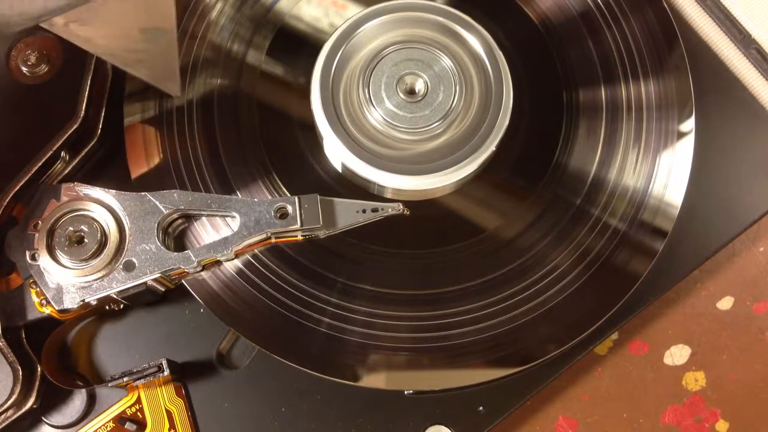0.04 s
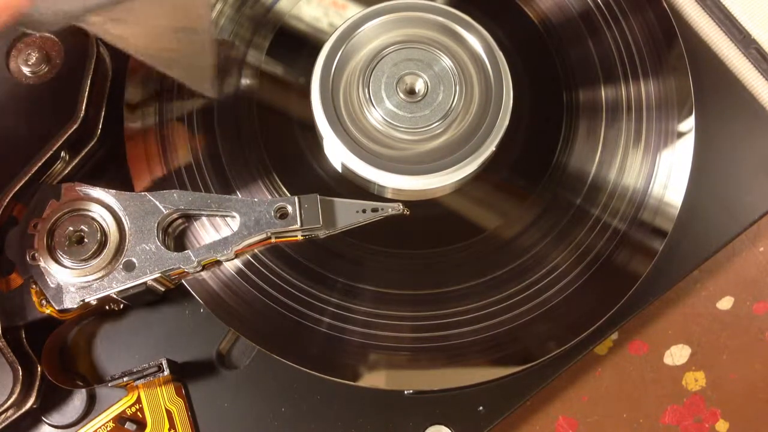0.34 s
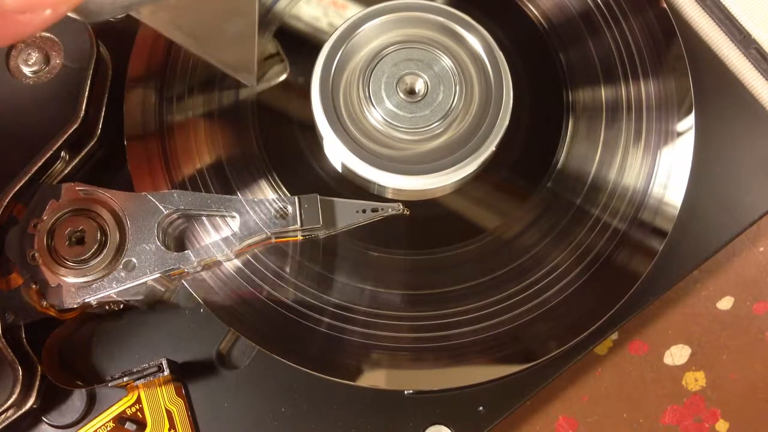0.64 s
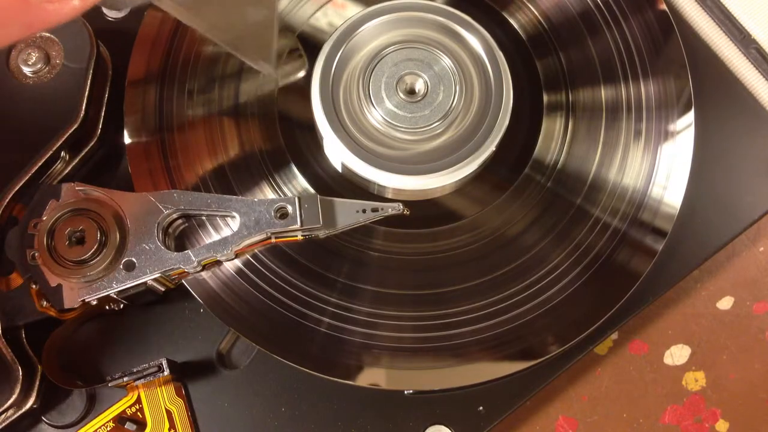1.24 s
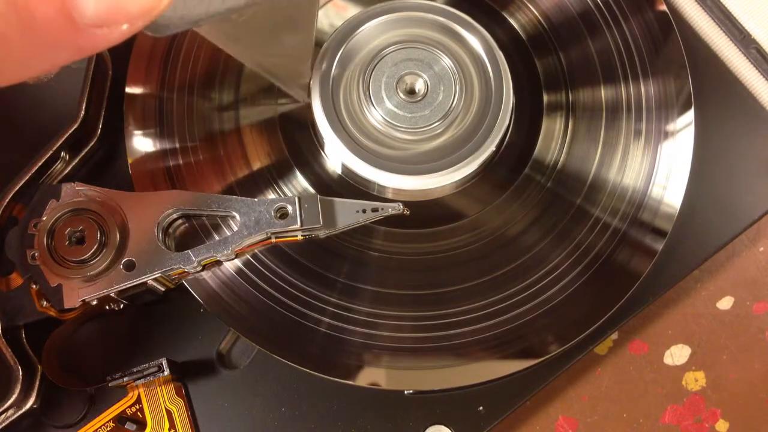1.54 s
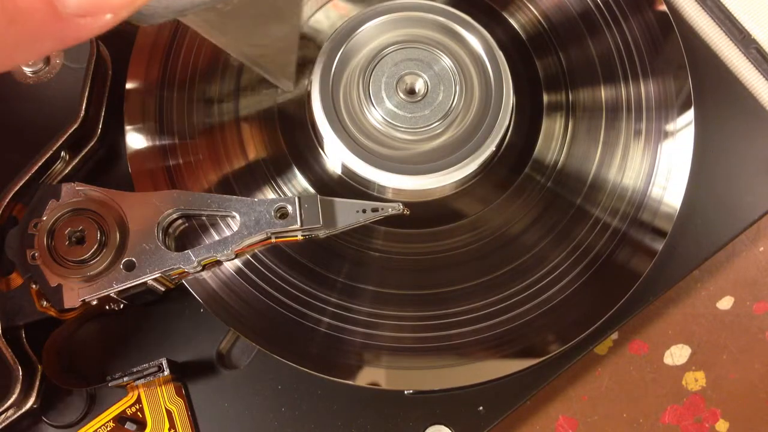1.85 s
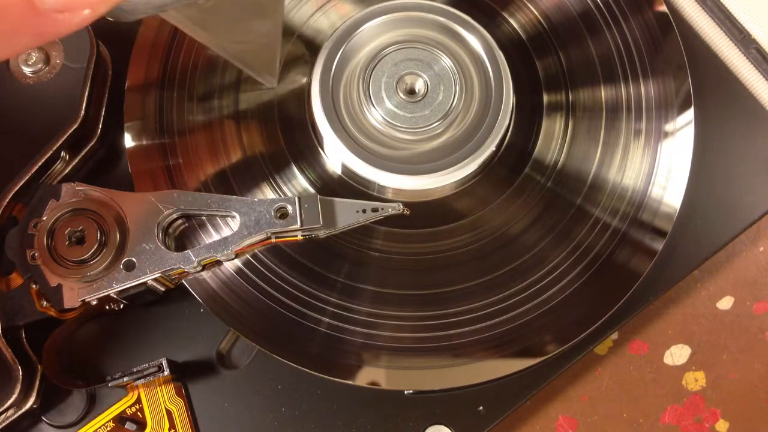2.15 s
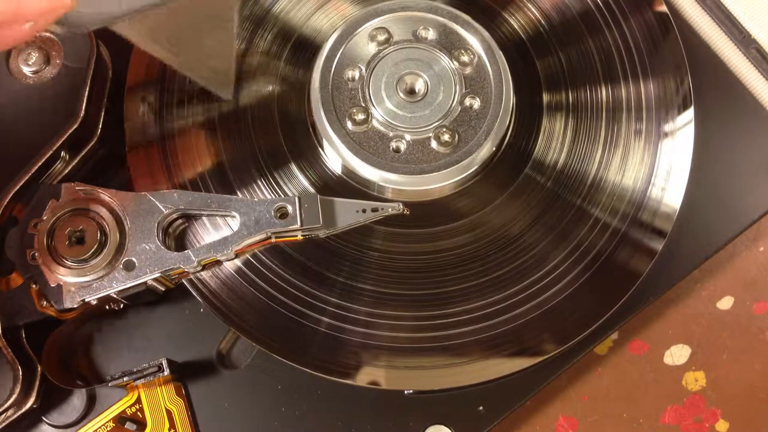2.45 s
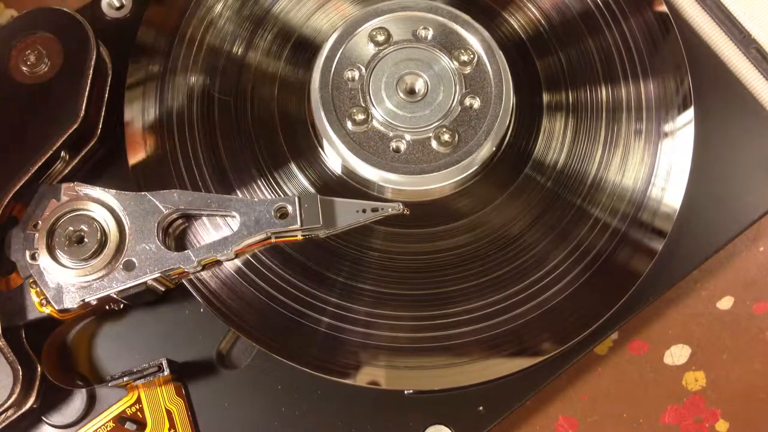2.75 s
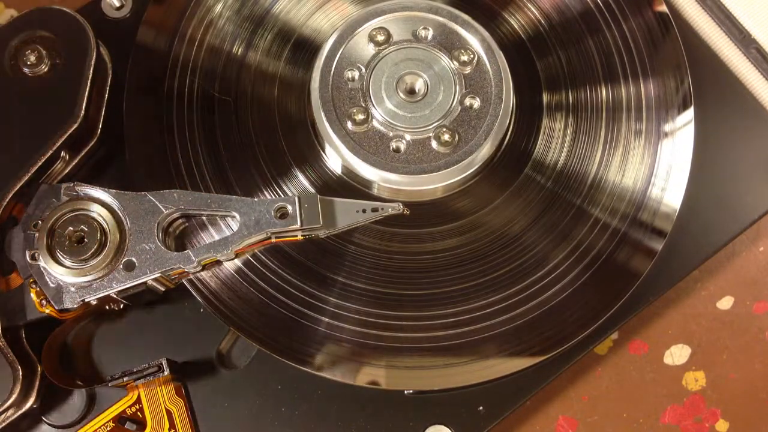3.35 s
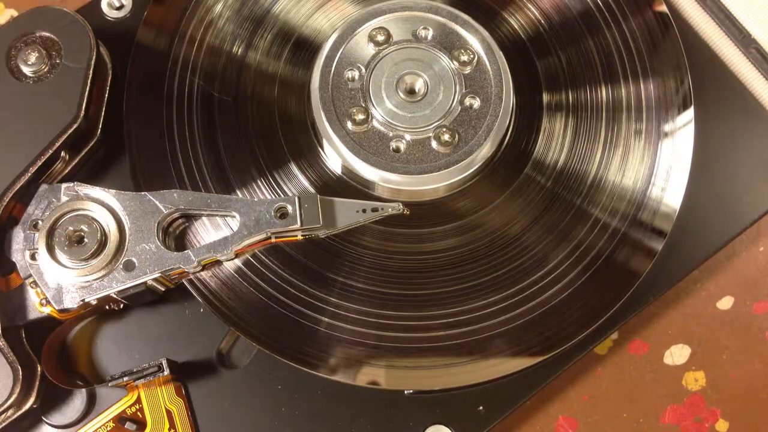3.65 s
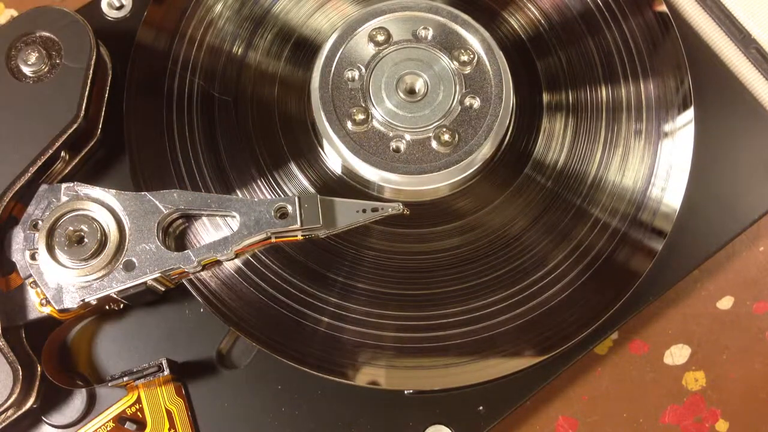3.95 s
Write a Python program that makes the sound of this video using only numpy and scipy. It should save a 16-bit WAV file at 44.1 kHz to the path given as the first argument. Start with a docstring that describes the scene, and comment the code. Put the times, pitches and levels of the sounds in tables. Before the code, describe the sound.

A blade scrapes a spinning hard drive platter: light metallic pings over a thin, ringing rub, then two harsh rasps. It clicks away, and a soft bump and two knocks follow over faint motor hum in a quiet room.

```python
"""Metallic pings sound over a thin, singing rub: a knife tip rests on the spinning platter of an open
hard drive. Friction excites the resonances of disc and blade; the tip catches and skids, then scrapes
until the disc stalls. The blade lifts off with a few clicks, the case is bumped and knocked, and the
motor hums on in a quiet room."""
import sys
import numpy as np
from scipy import signal
from scipy.fft import rfft, irfft
from scipy.io import wavfile
from scipy.ndimage import uniform_filter1d

SR = 44100
rng = np.random.default_rng(int(sys.argv[2]) if len(sys.argv) > 2 else 0)


def master(y):
    """Save y as 16-bit WAV."""
    cut = np.clip(np.atleast_2d(y).T, -1, 1)
    pcm = np.round(cut * 32767)  # scale
    wavfile.write(sys.argv[1], SR, pcm.astype(np.int16))


N = 176400
T = np.arange(N) / SR

# Taps on the platter. Each row: start in seconds, level in dB.
PING_TAPS = [(-.003, -21), (.188, -19), (.383, -18.5), (0.578, -19.5), (0.771, -15.5)]
# Rotation of the platter. Each row: time in seconds, turns per second.
PLATTER_SPEED = [(0, 56), (1.9, 66), (2.55, 40)]
# Force of the light rub. Each row: time in seconds, level in dB, treble gain in dB.
RUB_FORCE = [(0, -39, -3.5), (.85, -39, 3.5), (1.1, -40.5, 4), (1.4, -36.5, -0.5), (1.8, -34, -19.5),
             (2.18, -39, 3), (2.6, -53.5, -3)]
# Resonances of the rubbed platter. Each row: frequency in Hz, bandwidth in Hz, relative level in dB.
PLATTER_MODES = [(3112, 20, 0.5), (3312, 105, 2), (12760, 160, -4), (14480, 310, -5)]
# Hiss of the rub. Each row: frequency in Hz, relative spectral level in dB.
RUB_SPECTRUM = [(700, -17), (2700, -4.5), (3200, 8), (5400, 4), (6150, -53), (6900, -5), (10700, -3.5),
                (15000, -24)]
# Partials of the motor. Each row: frequency in Hz, level in dB.
HUM_PARTIALS = [(215.5, -63), (570, -70.5), (765, -68)]
# Noise of the room. Each row: frequency in Hz, relative spectral level in dB.
ROOM_SPECTRUM = [(30, -29), (90, -9.5), (170, 1), (400, -6.5), (750, -3), (2200, -13.5), (4000, -21),
                 (15000, -28)]
# Gain of hum and room noise together. Each row: time in seconds, gain in dB.
BACKGROUND_GAIN = [(0, -9.5), (.9, -2), (3.8, 1)]
# Catches of the tip. Each row: start in seconds, length in seconds, level in dB, treble gain in dB.
TIP_CATCHES = [(0.014, 0.021, -24.5, 13.5), (0.248, 0.021, -20.5, 9.5), (0.28, 0.0085, -18, 11),
               (0.363, 0.0052, -22.5, 13.5), (.399, 0.0031, -19, 11.5), (0.454, 0.022, -31, 1.5),
               (0.557, 0.0095, -27, 1), (0.632, 0.013, -26, 3.5), (0.65, 0.0052, -23.5, 7),
               (0.663, 0.0049, -21.5, 10), (1.134, 0.032, -25, 3.5), (1.232, .006, -25, 3.5),
               (1.383, 0.0061, -24.5, 0), (1.507, 0.0027, -21.5, -7), (2.224, 0.0074, -26, 4),
               (2.456, .002, -16.5, -3), (2.652, 0.0041, -34, -10.5)]
# Resonances of blade and disc. Each row: frequency in Hz, bandwidth in Hz, relative level in dB.
CONTACT_MODES = [(1392, 150, -5.5), (2055, 39, -9.5), (2244, 49, -1), (3273, 160, 1), (4190, 107, 3.5),
                 (4373, 110, 2.5), (4710, 101, 10), (5130, 25, 4), (9445, 20, 3.5), (10230, 85.3, -4),
                 (14000, 299, -2)]
# Grit of the scrape. Each row: frequency in Hz, relative spectral level in dB.
SCRAPE_SPECTRUM = [(60, -82.5), (450, -29.5), (900, -28.5), (1300, -3.5), (2400, -7), (3200, 0),
                   (5300, 3.5), (6100, -29), (6800, -10.5), (12000, -1), (14500, -8.5)]
# Force of the scrape. Each row: time in seconds, level in dB, growl gain in dB, treble gain in dB.
SCRAPE_FORCE = [(1.485, -75, 0, 0), (1.5, -42, 10, 7.5), (1.545, -31, 11, 6.5), (1.585, -42, 8, 4),
                (1.62, -25.5, 3, 4), (1.72, -32.5, 14.5, 11.5), (1.82, -60, 18.5, 20),
                (2.19, -44.5, 3.5, 2), (2.25, -40.5, 5.5, 9.5), (2.49, -30, -1.5, 2.5),
                (2.55, -35, 6.5, -4), (2.59, -65.5, 13, -10), (2.755, -37.5, 9.5, -1), (2.785, -87, 0, -10)]
# Snaps of the blade. Each row: start in seconds, level in dB, decay in seconds, treble gain in dB.
BLADE_CLICKS = [(1.497, -27, .003, -36), (2.7545, -28.5, 0.0026, -8), (2.7656, -33, 0.0034, 0.5),
                (2.785, -24, 0.0017, -1.5)]
# Resonances of a snap. Each row: frequency in Hz, bandwidth in Hz, relative level in dB.
SNAP_MODES = [(1350, 330, 0), (2150, 400, 0), (3400, 1500, -5), (7400, 2000, -4)]
# Low modes of the case. Each row: frequency in Hz, relative level in dB, seconds to fall by 60 dB.
CASE_MODES = [(106, 7.6, 0.097), (168.4, 6.7, 0.088)]
# Blows on the case. Each row: start in seconds, level in dB, decay in seconds, growl gain in dB.
CASE_KNOCKS = [(3.861, -32, 0.0049, 4.5), (3.963, -29.5, 0.0092, -7.5)]
# Response of the knocked case. Each row: frequency in Hz, relative spectral level in dB.
KNOCK_SPECTRUM = [(40, -32), (190, -0.5), (400, -13), (1000, -2.5), (4500, -16), (11000, -36), (14000, -51)]

RUB_GRIT_DB, CATCH_GRIT_DB, SCRAPE_GRIT_DB = 1, 2.4, 3.1  # spread of collision strengths


def undb(db):
    """Amplitude ratio of a level in decibels."""
    return 10 ** (np.asarray(db) / 20)


def unit(x):
    """Normalisation to an rms of 1."""
    return x / np.sqrt(np.mean(x ** 2))


def curve(rows, column=1):
    """Linear interpolation of one table column over time."""
    rows = np.array(rows, float)
    return np.interp(T, rows[:, 0], rows[:, column])


def wander(rate_hz):
    """Smooth random fluctuation with an rms of 1."""
    hold = max(int(SR / rate_hz), 1)
    steps = np.repeat(rng.standard_normal(N // hold + 1), hold)
    return unit(uniform_filter1d(steps, hold)[:N])


def colour(x, spectrum, size=2048):
    """Minimum-phase filtering to a given spectrum, preserving the power of white noise."""
    hz, db = np.array(spectrum, float).T
    bins_hz = np.maximum(np.fft.rfftfreq(size, 1 / SR), 1)
    gain = undb(np.interp(np.log(bins_hz), np.log(hz), db))
    cepstrum = irfft(np.log(gain))
    cepstrum[1:size // 2] *= 2  # folding the cepstrum makes the filter causal
    cepstrum[size // 2 + 1:] = 0
    response = irfft(np.exp(rfft(cepstrum)))
    return signal.fftconvolve(x, response / np.linalg.norm(response))[:N]


def ring(x, modes, damping_hz=0, size=16384):
    """Modal superposition: a force drives decaying sinusoids; damping widens every resonance."""
    t = T[:size]
    response = sum(undb(db) * width * np.exp(-np.pi * (width + damping_hz) * t)
                   * np.cos(2 * np.pi * hz * t) for hz, width, db in modes)
    response[0] /= 2
    return signal.fftconvolve(x, response / np.linalg.norm(response))[:N]


def shelve(x, growl_db=0, treble_db=0):
    """Zero-phase shelving weights the low end (growl) and the high end (treble) of a contact force."""
    low = signal.sosfiltfilt(signal.butter(3, 2710, "low", fs=SR, output="sos"), x)
    high = signal.sosfiltfilt(signal.butter(3, 6200, "high", fs=SR, output="sos"), x)
    return x + (undb(growl_db) - 1) * low + (undb(treble_db) - 1) * high


def grit(spread_db, grains_per_s=7000):
    """Shot noise: tiny random collisions of metal on metal, a few stronger than the rest."""
    hits = rng.random(N) < grains_per_s / SR
    signs = rng.choice([-1, 1], N)
    strengths = undb(spread_db * np.minimum(rng.exponential(size=N), 5))
    return unit(hits * signs * strengths)


def burst(start, attack, release_at, decay):
    """Impact envelope: a linear rise, then exponential decay from release_at seconds after the start."""
    t = T - start
    return np.clip(t / attack, 0, 1) * np.exp(-np.clip((t - release_at) / decay, 0, 50))


def pings(from_hz=6200, to_hz=3000, fall_s=.0009, attack_s=.0018):
    """Dispersion: bending waves in the platter arrive treble first, as a falling chirp, then rattle."""
    chirps, rattle = 0, 0
    for start, db in PING_TAPS:
        hz = to_hz + (from_hz - to_hz) * np.exp(-np.maximum(T - start - attack_s, 0) / fall_s)
        sweep = np.sin(2 * np.pi * np.cumsum(hz) / SR)
        chirps += undb(db) * burst(start, attack_s, attack_s, decay=.003) * sweep
        rattle += undb(db) * burst(start, attack_s, attack_s, decay=.018)
    return chirps + undb(-9) * colour(rattle * grit(CATCH_GRIT_DB), RUB_SPECTRUM)


def platter_angle():
    """The angle in radians is the time integral of the rotation speed."""
    return 2 * np.pi * np.cumsum(curve(PLATTER_SPEED)) / SR


def rubbing():
    """Sliding friction, slightly stronger once a turn, drives the platter's modes until the stall."""
    angle = platter_angle()
    ripple_db = .5 * (np.sin(angle) + .5 * np.sin(2 * angle))
    turning = T < RUB_FORCE[-1][0]
    force = undb(curve(RUB_FORCE) + ripple_db) * turning
    contact = lambda: shelve(force * grit(RUB_GRIT_DB), treble_db=curve(RUB_FORCE, 2))
    return undb(-3) * ring(contact(), PLATTER_MODES) + undb(-7.5) * colour(contact(), RUB_SPECTRUM)


def motor_and_room(flutter_db=2, pitch_waver=.00777):
    """Random amplitude and frequency modulation make the motor's hum waver over broadband room noise."""
    hum = 0
    for hz, db in HUM_PARTIALS:
        amplitude = np.sqrt(2) * undb(db + flutter_db * wander(12))
        pitch_hz = hz * (1 + pitch_waver * wander(17))
        hum += amplitude * np.sin(2 * np.pi * np.cumsum(pitch_hz) / SR)
    air = undb(-55 + .49 * wander(9.04)) * colour(rng.standard_normal(N), ROOM_SPECTRUM, size=8192)
    return undb(curve(BACKGROUND_GAIN)) * (hum + air)


def catches(attack_s=.0031, release_s=.0052):
    """Transient friction: the tip digs in, skids for milliseconds and leaves the blade ringing."""
    power, weighted_treble = 1e-18, 0
    for start, length, db, treble_db in TIP_CATCHES:
        rise = np.minimum((T - start) / attack_s - 1, 0)
        fall = np.maximum(T - start - length, 0) / release_s
        skid_power = (undb(db) * np.exp(rise - fall)) ** 2
        power += skid_power  # overlapping skids add in power
        weighted_treble += skid_power * treble_db
    force = np.sqrt(power)
    contact = lambda: shelve(force * grit(CATCH_GRIT_DB), growl_db=-1, treble_db=weighted_treble / power)
    return .5 * colour(contact(), SCRAPE_SPECTRUM) + undb(-4) * ring(contact(), CONTACT_MODES)


def scraping():
    """Ploughing friction: the pressed blade chatters on the disc, and the contact damps its modes."""
    chatter_db = 2 * np.sin(platter_angle()) + 2 * wander(250)
    force = undb(curve(SCRAPE_FORCE) + chatter_db)
    growl_db, treble_db = curve(SCRAPE_FORCE, 2), curve(SCRAPE_FORCE, 3)
    contact = lambda: shelve(force * grit(SCRAPE_GRIT_DB), growl_db, treble_db)
    rasp = undb(-7) * colour(contact(), SCRAPE_SPECTRUM)
    return rasp + undb(-6) * ring(contact(), CONTACT_MODES, damping_hz=65)


def clicks():
    """Impact excitation: the blade snaps against the drive; heavily damped modes give a short clack."""
    noise = rng.standard_normal(N)
    force = sum(shelve(undb(db) * burst(start, .0006, .0035, decay) * noise, treble_db=treble_db)
                for start, db, decay, treble_db in BLADE_CLICKS)
    return ring(force, SNAP_MODES)


def case_bump(start_s=2.846, attack_s=.0048):
    """Free vibration: a soft bump as the blade leaves sets the low modes of the case ringing briefly."""
    t = np.maximum(T - start_s, 0)
    modes = sum(undb(db - 60 * np.minimum(t / t60, 2)) * np.sin(2 * np.pi * hz * t)
                for hz, db, t60 in CASE_MODES)
    return -undb(-37.5) * modes * np.minimum(t / attack_s, 1)


def case_knocks():
    """Source and filter: brief noisy blows, shaped by the case's broad response, sound as dry knocks."""
    blows = sum(shelve(undb(db) * burst(start, .0021, .0039, decay) * rng.standard_normal(N), growl_db)
                for start, db, decay, growl_db in CASE_KNOCKS)
    return colour(blows, KNOCK_SPECTRUM)


def reverberation(x, t60_s=.15, delay_s=.004, cutoff_hz=6010):
    """Diffuse reflections in a small room form a short, dull tail that decays exponentially."""
    t = T[:SR // 2]
    response = rng.standard_normal(len(t)) * np.exp(-np.log(1000) * t / t60_s) * (t > delay_s)
    response = signal.sosfilt(signal.butter(1, cutoff_hz, fs=SR, output="sos"), response)
    return undb(-13) * signal.fftconvolve(x, response / np.linalg.norm(response))[:N]


def scene():
    """Superposition: the contact sounds and their reverberation add to dry clicks, hum and room noise."""
    direct = rubbing() + scraping() + catches() + pings() + case_bump() + case_knocks()
    return (direct + reverberation(direct) + clicks() + motor_and_room())[None]


def record(dry):
    """Band limiting: a high-pass filter thins the deep bass and a steep low-pass cuts the top."""
    thinned = signal.sosfilt(signal.butter(2, 60, "high", fs=SR, output="sos"), dry)
    return signal.sosfilt(signal.ellip(10, .2, 80, 15700, fs=SR, output="sos"), thinned)


dry = scene()
out = record(dry)
master(out)
```